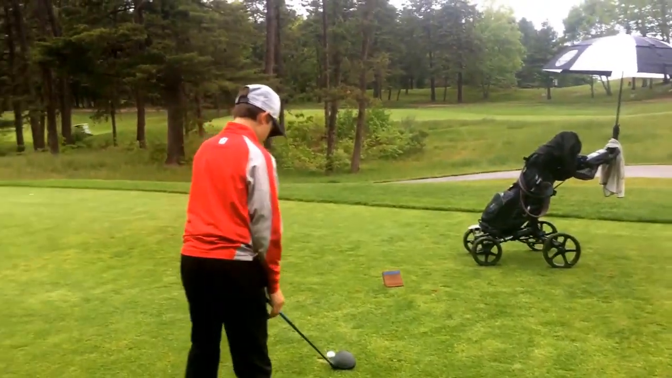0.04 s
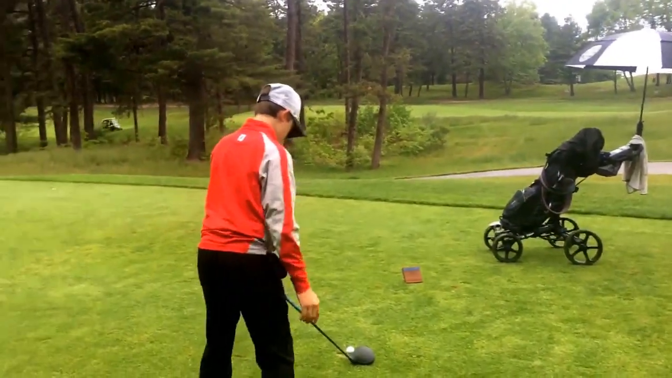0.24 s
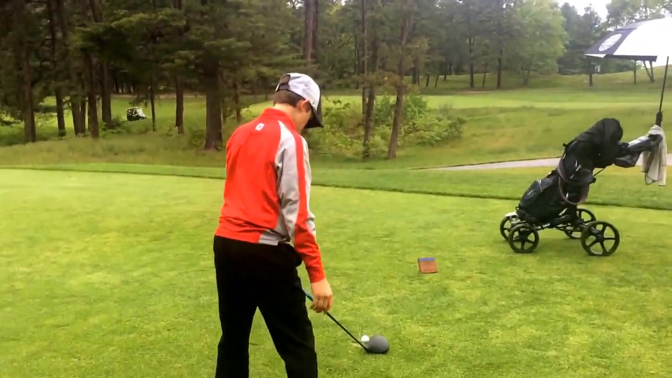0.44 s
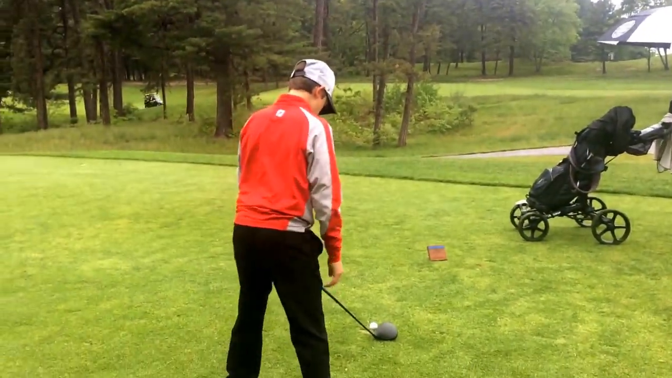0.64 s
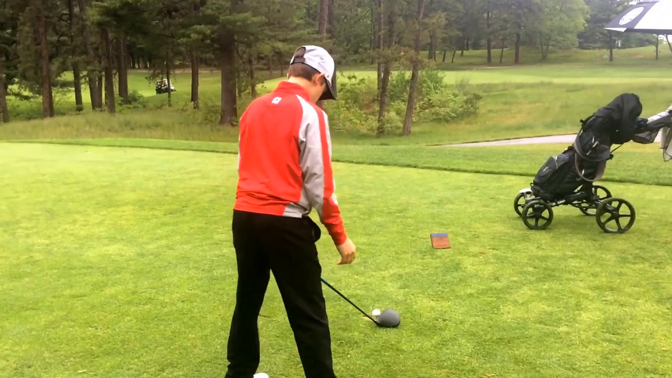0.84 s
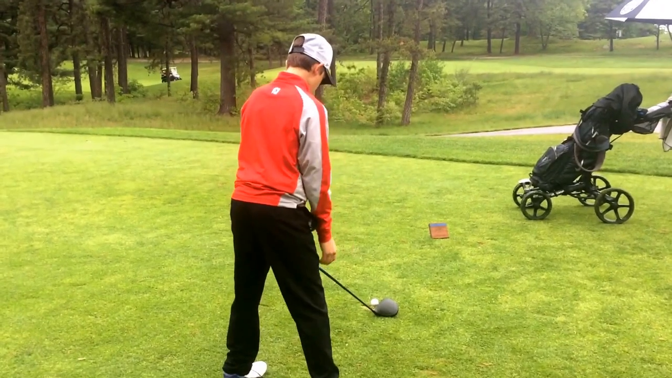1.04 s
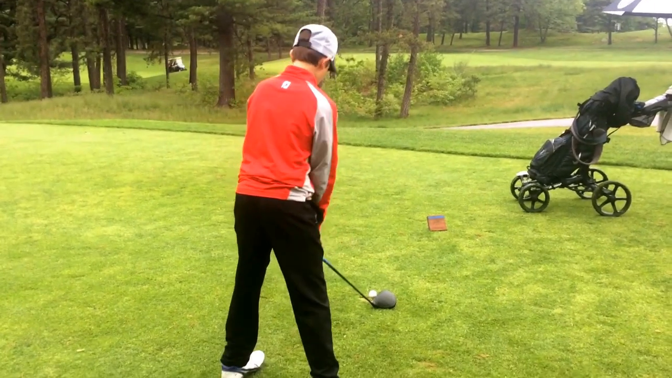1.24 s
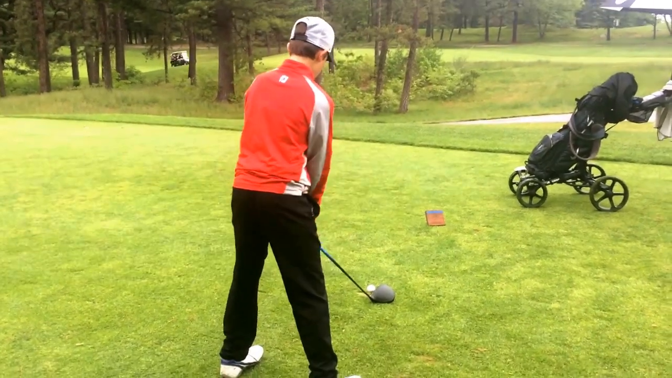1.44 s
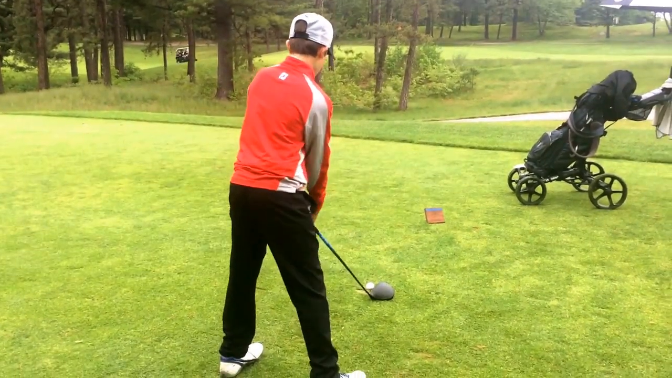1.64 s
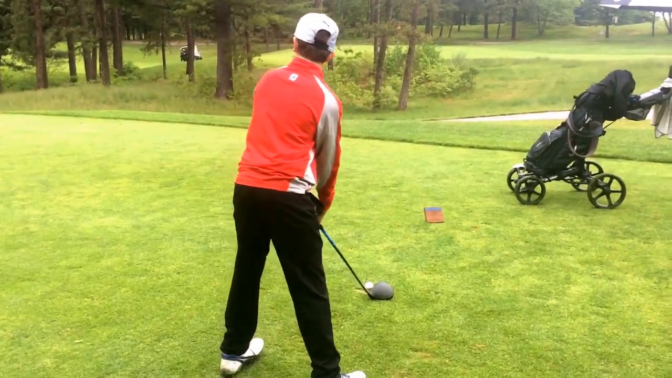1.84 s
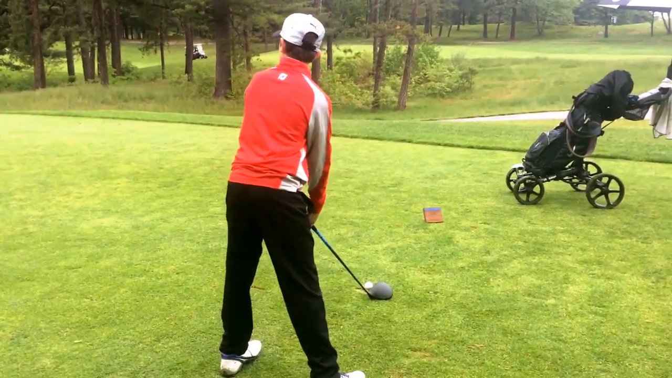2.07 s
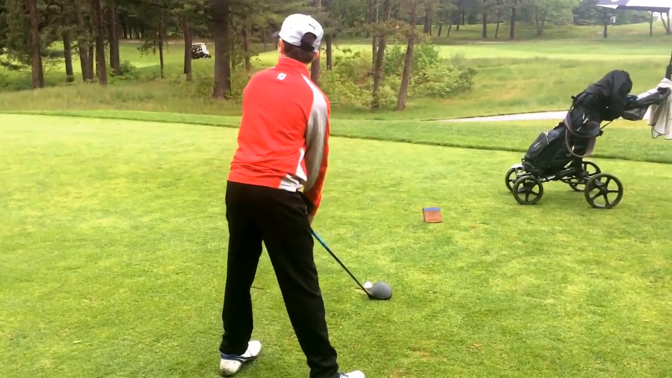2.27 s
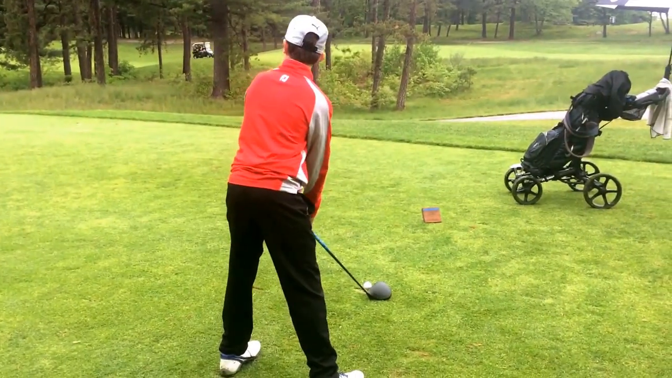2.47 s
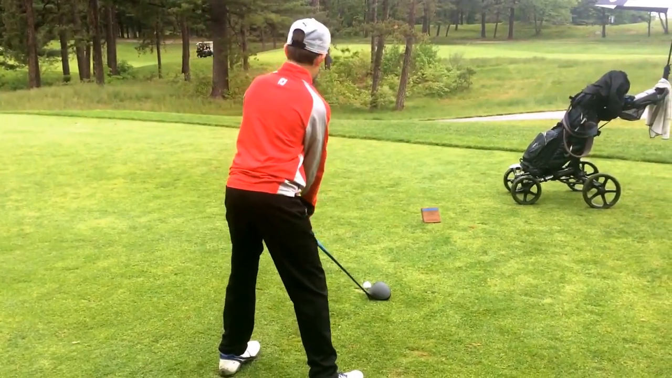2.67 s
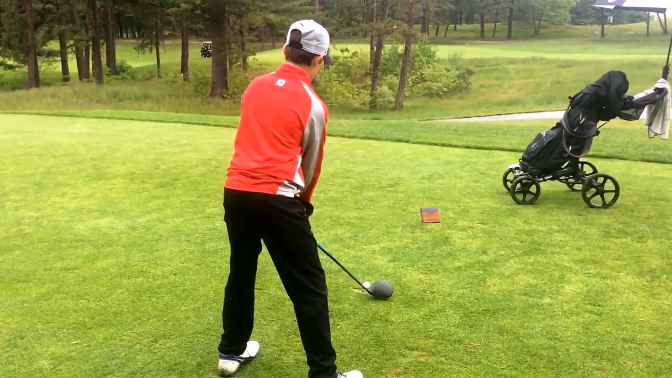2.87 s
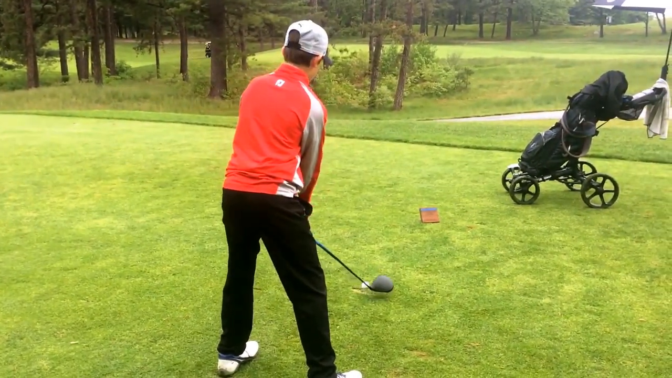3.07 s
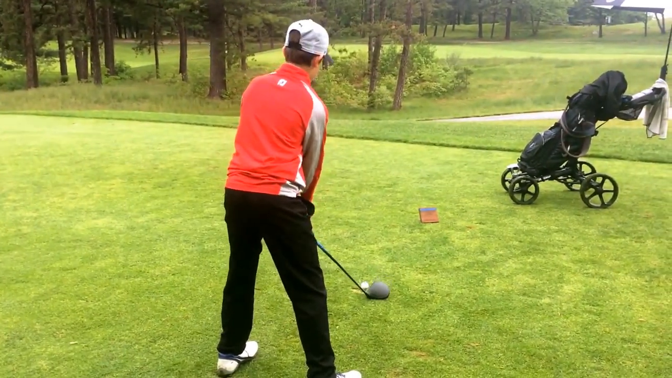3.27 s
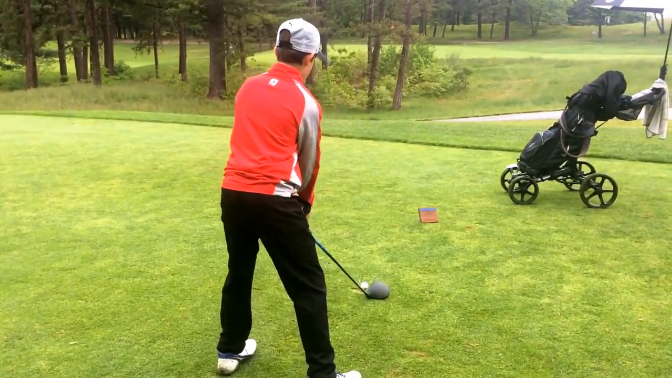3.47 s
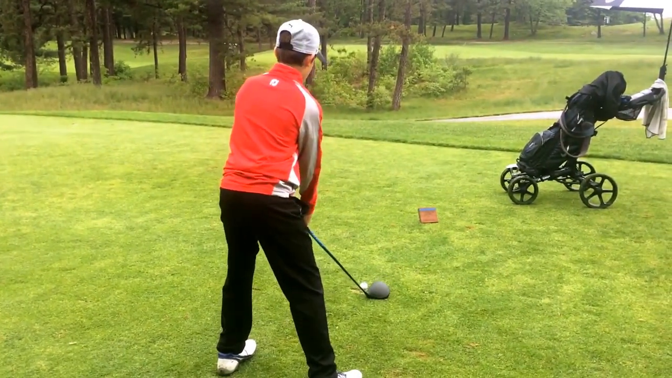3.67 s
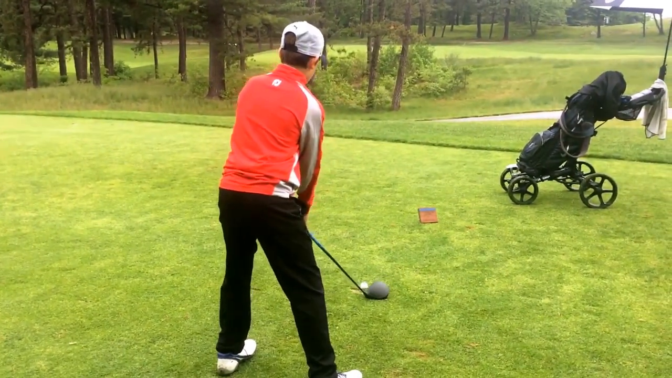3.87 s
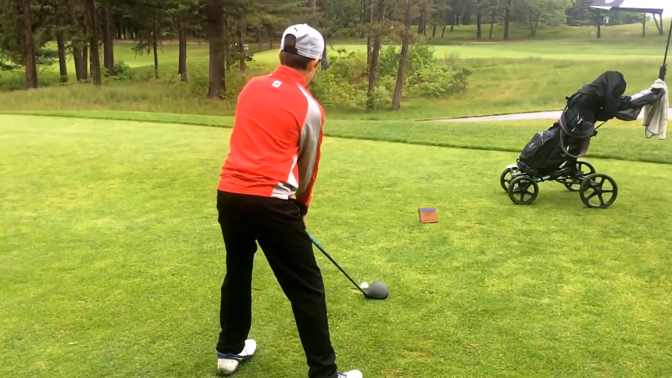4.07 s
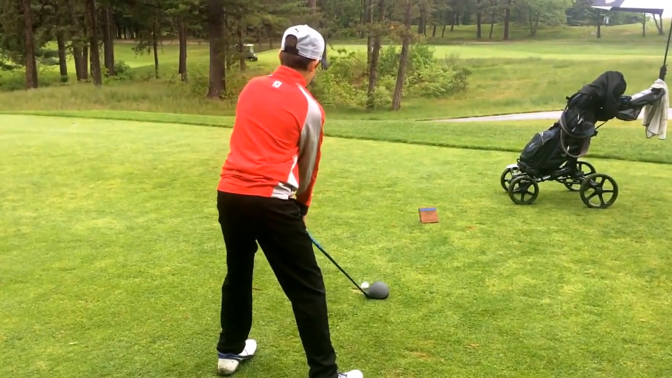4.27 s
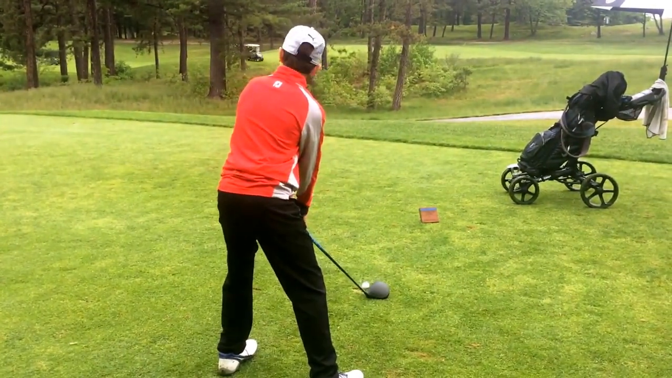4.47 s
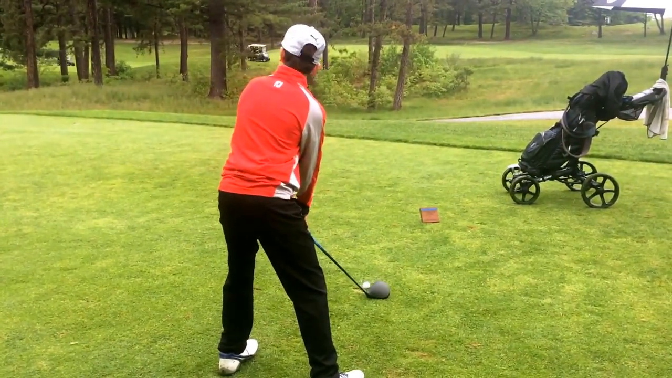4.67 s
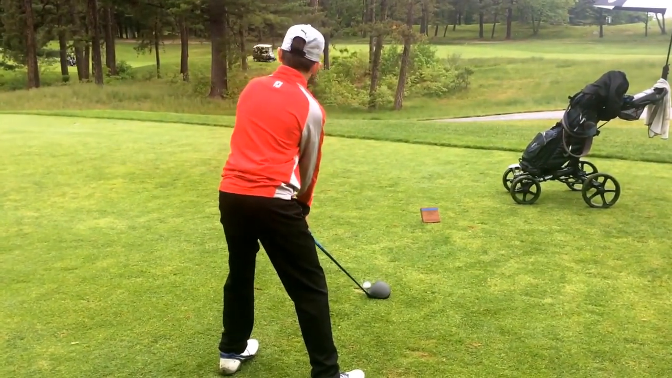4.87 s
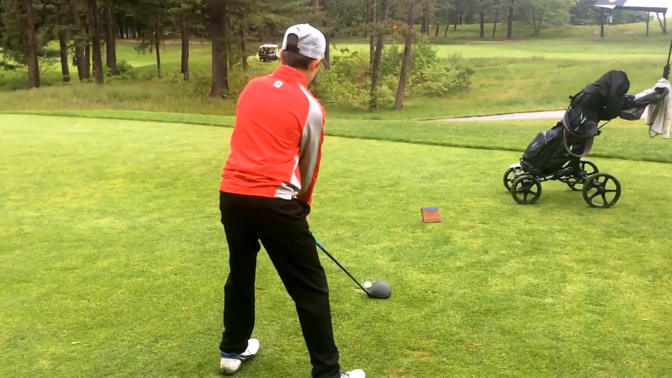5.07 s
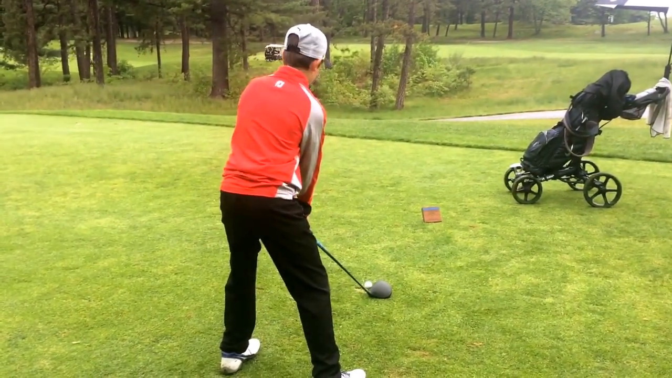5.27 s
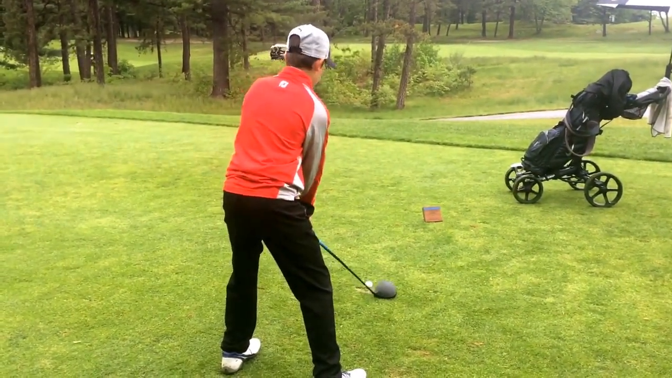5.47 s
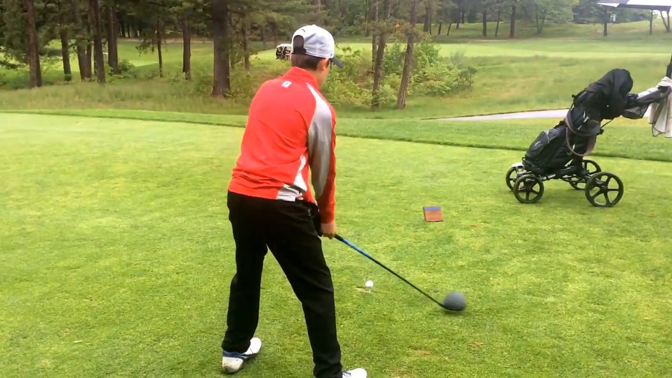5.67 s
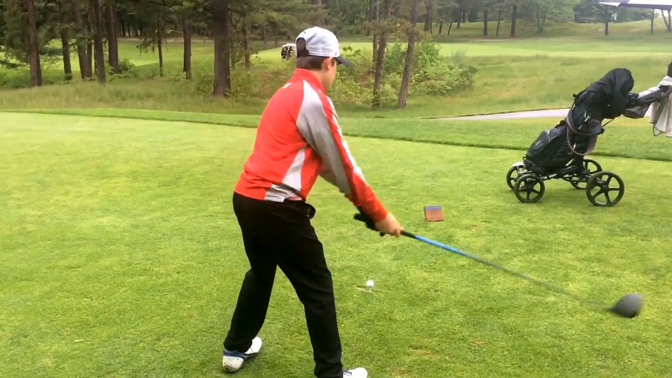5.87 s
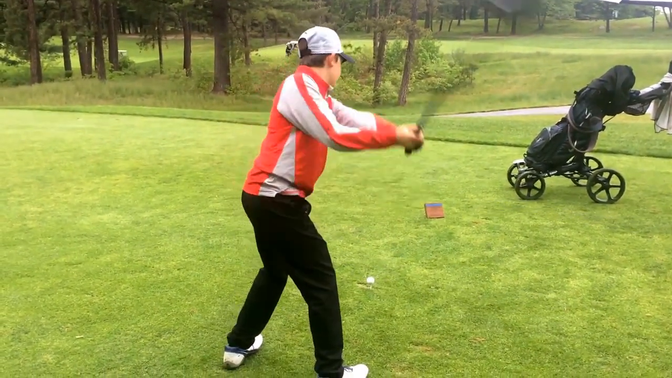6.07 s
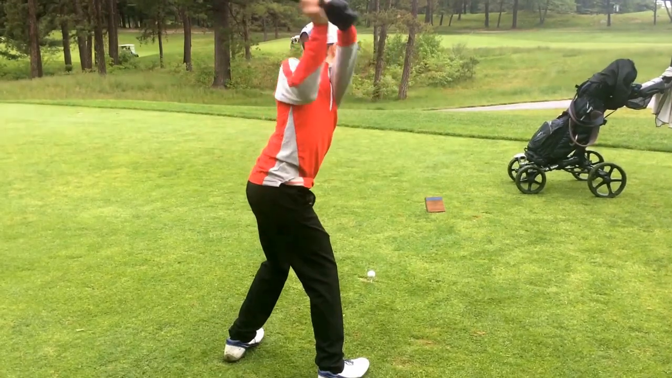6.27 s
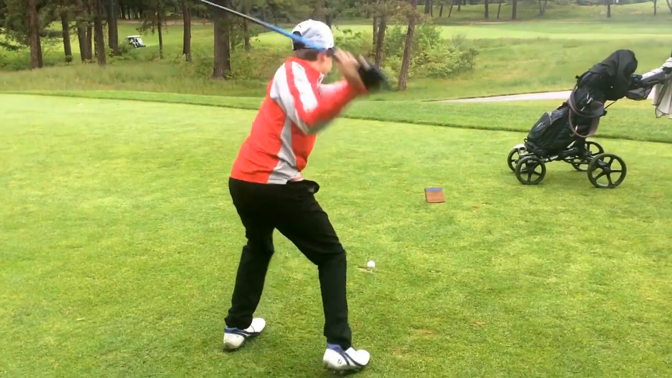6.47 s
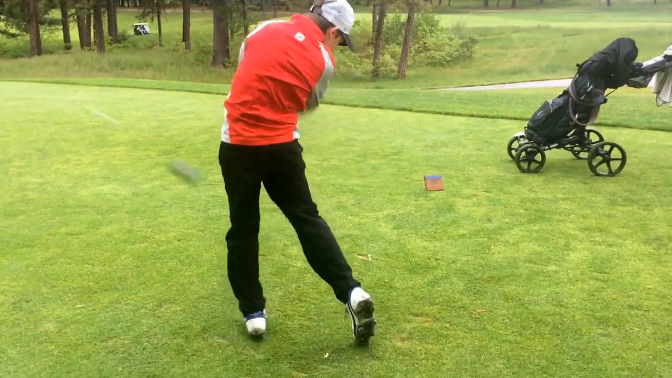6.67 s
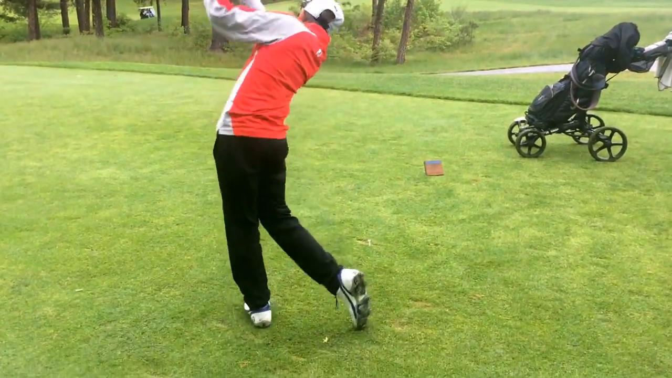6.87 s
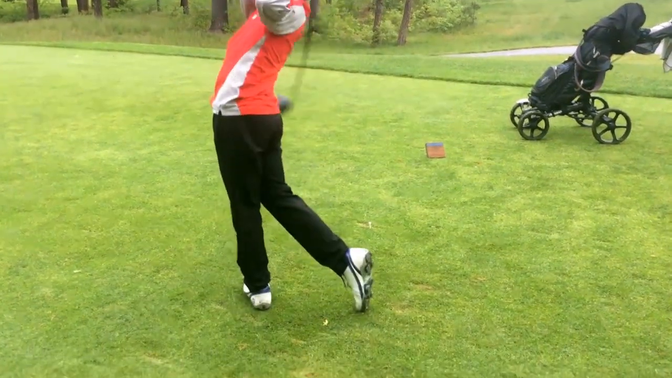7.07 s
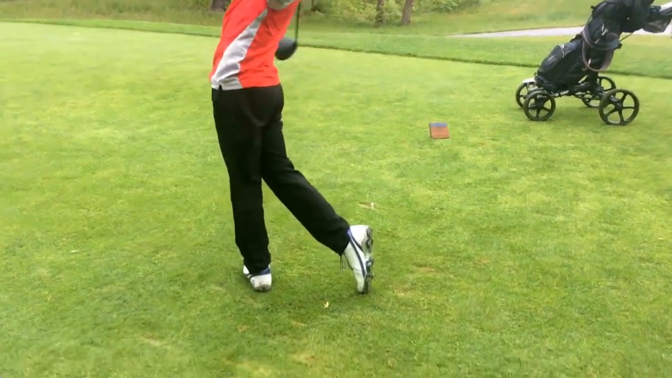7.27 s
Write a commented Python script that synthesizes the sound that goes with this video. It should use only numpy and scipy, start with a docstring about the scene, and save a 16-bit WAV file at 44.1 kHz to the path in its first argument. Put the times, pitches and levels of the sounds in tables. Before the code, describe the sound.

A golf drive comes late in a calm stretch of light rain outdoors. First there are only irregular drops tapping a nearby umbrella, two faint birds and a low, far engine. Then a soft puff of wind touches the microphone, and a club close by whooshes into the ball with one sharp metallic crack. It swishes round again more softly, and the shaft bumps the golfer's shoulders.

```python
"""A golf drive in light rain

Rain ticks on a nearby umbrella, two birds sing in echoing pines and a far engine drones.
Near the end a golf club swishes down, stirring the air, and cracks the ball off the tee.
Its hollow head rings, the club swishes round again and the shaft thumps on the shoulders."""
import sys
import numpy as np
from scipy import signal
from scipy.fft import rfft, irfft, next_fast_len
from scipy.io import wavfile
from scipy.ndimage import map_coordinates

SR = 44100
rng = np.random.default_rng(int(sys.argv[2]) if len(sys.argv) > 2 else 0)


def materialize(psi):
    """Save the field psi as 16-bit PCM at rate SR to the path in sys.argv[1].

    A 1-D psi becomes a single channel; in a 2-D psi each row is a channel.
    """
    bounded = np.clip(np.atleast_2d(psi).T, -1, 1)
    quanta = np.round(bounded * 32767).astype(np.int16)
    wavfile.write(sys.argv[1], SR, quanta)


N = 322723

# The engine's firing tone and the tone an octave above: time_s, firing_db, octave_db
ENGINE_LEVELS = [(0.0, -58, -69), (0.59, -71.5, -59.5), (1.24, -62.5, -75), (2.16, -55, -57),
                 (2.44, -53.5, -68.5), (2.65, -59, -61), (4.48, -66, -71), (4.81, -68.5, -54.5),
                 (5.87, -66, -73), (6.32, -65, -61.5), (7.32, -76, -62)]
# A colour says how strong the lows and highs of a noise are next to each other.
# Colours of the far rumble and of rain on grass and trees: frequency_hz, relative_db
RUMBLE_COLOUR = [(12, -49.5), (20, -20.5), (60, -4.5), (97, 2), (147, 1), (178, -7.5), (253, -18.5),
                 (300, -21.5), (390, -52.5), (660, -120)]
DRIZZLE_COLOUR = [(110, -42), (180, -8), (270, -11.5), (570, -16.5), (930, -18), (1600, -24), (3000, -30),
                  (6000, -34), (10000, -38.5), (15000, -40.5), (17000, -45.5)]
# Loudness of the drizzle and of the bird's trill: time_s, level_db
DRIZZLE_LEVELS = [(0, -65), (2.5, -66.5), (4.7, -67), (6.1, -66), (7.32, -63.5)]
TRILL_LEVELS = [(0, -77), (1, -74.5), (2, -74), (2.8, -77), (2.88, -110)]
# The two parts of a trill syllable: share_of_syllable, pitch_hz, relative_db
TRILL_SWEEP = [(0, 3590, -41), (.03, 3764, -9.5), (.16, 4585, 1.5), (.27, 5085, -5.5), (.4, 5084, -12),
               (.46, 4740, -49)]
TRILL_CHIP = [(.6, 6440, -42), (.66, 6325, 0), (.75, 6394, -1), (.79, 7360, 0), (.85, 6730, -1),
              (.92, 6490, -2), (.98, 6390, -41)]
# How long the pines' echo takes to fade by 60 dB: frequency_hz, fade_s
ECHO_FADES = [(300, 0.67), (2300, 1.56), (5000, 1.03), (12000, 0.44)]
# The clearest drops on the umbrella: start_s, thud_db, snap_strength_db, pitch_hz
CLEAR_DROPS = [(0.12, -50, -57.5, 1100), (0.387, -44, -67, 1340), (0.413, -48, -61.5, 1060),
               (0.474, -36, -55, 1980), (0.991, -35.5, -50, 1145), (1.034, -42, -57, 1810),
               (1.056, -44, -58, 1360), (1.194, -50, -64, 1900), (1.448, -47.5, -62, 914),
               (1.852, -55, -64, 1000), (2.108, -49, -67, 1480), (2.274, -50.5, -59.5, 910),
               (2.34, -41, -62, 1310), (2.416, -44.5, -62, 1160), (2.435, -53, -61, 1390),
               (2.632, -48.5, -68, 1680), (2.73, -48, -72, 1300), (3.167, -48.5, -61.5, 1310),
               (3.47, -42.5, -61.5, 1690), (4.107, -56, -57, 1344), (4.225, -47, -62, 1330),
               (4.563, -43.5, -61, 1610), (4.598, -49, -57.5, 980), (4.613, -46.5, -55, 1140),
               (4.949, -46, -55.5, 915), (4.985, -45.5, -57.5, 1240), (5.018, -36, -59, 1600),
               (5.231, -51, -58, 1570), (5.433, -49, -50.5, 1530), (5.559, -45, -56.5, 900),
               (5.884, -51, -72, 1620), (5.904, -35, -44, 1460), (5.919, -50, -64, 1550),
               (6.224, -42, -58, 1580), (6.236, -30.5, -51.5, 1740), (6.301, -31, -47, 1670),
               (6.453, -44, -56, 1090), (6.47, -48, -57.5, 1020), (7.168, -54, -62, 1280),
               (7.2, -52, -61, 1150)]
# Colour of a bursting drop: frequency_hz, relative_db
SNAP_COLOUR = [(300, -28), (1500, 8), (3000, 0.5), (7000, -4), (11000, -14), (16000, -25)]
# Brief rings: drips on the umbrella, and last a high ring as the club finishes: start_s, level_db, pitch_hz
BRIEF_RINGS = [(1.594, -46, 3430), (4.345, -56, 2200), (4.366, -42, 5330), (4.368, -54, 2850),
               (6.206, -52.5, 2790), (6.495, -47, 2140), (6.545, -51, 6270), (6.984, -35, 5090)]
# A faint falling note before the bird's whistles: time_s, pitch_hz, level_db
OPENING_NOTE = [(.2, 2850, -81), (.24, 2660, -71), (.3, 2590, -72), (.35, 2480, -86)]
# Whistled notes, in pairs: start_s, length_s, peak_after_s, pitch_hz, level_db, droop_hz
BIRD_NOTES = [(.41, 0.24, .1, 2330, -55.5, 27), (.8, .22, .14, 2310, -58, 79),
              (3.538, 0.233, 0.1295, 2300, -52.5, 15), (3.9, 0.23, 0.094, 2322, -55, 73)]
# Moves of the golfer's jacket: start_s, hold_s, level_db
JACKET_MOVES = [(3.31, .1, -73), (4.244, .1, -71), (6.172, 0.017, -76), (6.304, 0.4, -68.5)]
# Colours of the jacket and of a wind puff: frequency_hz, relative_db
JACKET_COLOUR = [(500, -33), (1200, 0), (3000, 0), (5000, -8), (12000, -17)]
WIND_COLOUR = [(20, -17), (55, -2), (110, 2), (170, -21), (300, -75)]
# Passes of the club: fastest_s, rise_s, fall_s, top_pitch_hz, whistle_db, hiss_lag_s, hiss_db
CLUB_PASSES = [(6.684, .11, .06, 771, -33.5, .022, -41.5), (7.025, 0.1, 0.16, 332.6, -47.5, 0.029, -45)]
# Hiss of the falling club, then of club and jacket at the finish: frequency_hz, relative_db
DOWNSWING_COLOUR = [(530, -23), (900, -5.5), (1130, -12.5), (1450, -13.5), (2390, -18.5), (13500, -31),
                    (15600, -38)]
FINISH_COLOUR = [(240, -31), (400, -5.5), (650, -14), (1100, -3.5), (2200, -12), (3300, -16), (4900, -8),
                 (6200, -15), (8700, -17), (11300, -26.5), (13200, -24), (15600, -32)]
# The club face's crack and the duller hiss that dies last: frequency_hz, relative_db
CRACK_COLOUR = [(700, -41), (1200, -15.5), (2500, -7.5), (3300, -18.5), (4200, -7.5), (5500, -6),
                (9000, -7.5), (13000, -14.5), (15600, -19)]
CRACK_TAIL_COLOUR = [(1500, -25), (2300, 1), (4500, -3.5), (7500, -8), (11000, -25)]
# Tones of the hollow head, swelling as it turns to the listener: pitch_hz, level_db, fade_s, swell_s
HEAD_TONES = [(1766, -35.5, 0.4, 0.03), (1910, -35, .3, 0.0248), (2066, -26, 0.29, .015),
              (2443, -24, 0.24, 0.0044), (2600, -27, 0.13, 0.006), (3083, -20.5, 0.12, 0.0085),
              (3460, -23.5, .06, 0.0078), (4140, -14, 0.059, 0.0013), (4350, -20, 0.076, 0.0033),
              (4500, -23, 0.093, 0.0079), (5460, -24, 0.089, 0.012), (6260, -24, 0.16, 0.0098),
              (6340, -24, 0.078, .016), (6595, -11, .07, 0.014), (6850, -12.5, 0.072, 0.015),
              (7370, -24.5, 0.052, 0.0021), (8150, -26.5, 0.087, 0.0088), (9070, -26, 0.053, .002),
              (9500, -28.5, .06, 0.014), (10130, -19.5, 0.069, .012), (12500, -26, 0.025, 0.00091)]


def amp(db):
    """Turns decibels into a number to multiply by."""
    return 10 ** (np.asarray(db) / 20)


def unit(x):
    """Scales a sound to an average power of 1."""
    return x / np.sqrt(np.mean(x ** 2) + 1e-20)


def along(points, hz):
    """Reads between the rows of a frequency table, giving octaves about equal room."""
    frequencies, values = np.transpose(points)
    return np.interp(np.log(hz + 1), np.log(frequencies + 1), values)


def curves(rows):
    """Turns each column after the time into one value per sample."""
    times, *columns = np.transpose(rows)
    return [np.interp(np.arange(N) / SR, times, column) for column in columns]


def wobble(rate):
    """A smooth curve through `rate` random values a second."""
    return map_coordinates(rng.standard_normal(int(N * rate / SR) + 4), [np.arange(N) * rate / SR])


def swell(start_s, hold_s, db, rise_s, fall_s):
    """Loudness that climbs 40 dB per rise_s, holds from start_s, then sinks 40 dB per fall_s."""
    t = np.arange(N) / SR - start_s
    return amp(db - 40 * np.maximum(0, np.maximum(-t / rise_s, (t - hold_s) / fall_s)))


def filtered(x, response):
    """Turns each frequency up or down by response(hz)."""
    size = next_fast_len(len(x) + 8192)
    return irfft(rfft(x, size) * response(np.fft.rfftfreq(size, 1 / SR)), size)[:len(x)]


def noise(colour, size=N):
    """Noise of the given colour, with power 1."""
    return unit(filtered(rng.standard_normal(size), lambda hz: amp(along(colour, hz))))


def tone(hz):
    """A pure tone of power 1 that follows a pitch curve."""
    return np.sqrt(2) * np.sin(2 * np.pi * np.cumsum(hz) / SR)


def breathy_tone(hz, width_hz):
    """A narrow band of noise that follows a pitch curve."""
    phase = 2 * np.pi * np.cumsum(hz) / SR
    return unit(wobble(width_hz) * np.cos(phase) + wobble(width_hz) * np.sin(phase))


def ring(db, hz, fade_s):
    """A short rough ring that starts softly and loses 60 dB in fade_s."""
    t = np.arange(SR // 8) / SR
    drift = .021 * np.sqrt(hz / 50) * rng.standard_normal(len(t)).cumsum()
    return np.sin(2 * np.pi * hz * t + drift) * amp(db - 60 * t / fade_s) * (1 - np.exp(-t / .0032))


def add(track, start_s, sound):
    """Mixes a short sound into a track."""
    part = track[round(start_s * SR):][:len(sound)]
    part += sound[:len(part)]


def far_engine():
    """An engine fires in a wavering drone; a rumble gently follows its louder tone."""
    firing_db, octave_db = curves(ENGINE_LEVELS)
    firing_hz = 78.8 + .5 * wobble(1.5)
    firing = amp(firing_db + 1.8 * wobble(6.9)) * tone(firing_hz)
    octave = amp(octave_db + 2.2 * wobble(8.8)) * tone(2 * firing_hz)
    louder_db = np.maximum(firing_db, octave_db)
    rumble_db = -57 + .28 * (louder_db - louder_db.mean()) + 1.5 * wobble(6)
    return firing + octave + amp(rumble_db) * noise(RUMBLE_COLOUR)


def drizzle():
    """Fine rain on grass and trees blends into an even hiss."""
    return amp(curves(DRIZZLE_LEVELS)[0] + .7 * wobble(9)) * noise(DRIZZLE_COLOUR)


def trilling_bird():
    """A bird repeats one syllable: a rising sweep, then a high chip."""
    t = np.arange(N) / SR
    share = (14.16 * t - .15 * t ** 2 - .115) % 1  # about 14 syllables a second, slowing a little
    out, trill_db = 0, curves(TRILL_LEVELS)[0]
    for shape, part_db, echo_db in (TRILL_SWEEP, 0, -1.5), (TRILL_CHIP, -2, 2.5):
        at, hz, db = np.transpose(shape)
        level_db = trill_db + part_db + np.interp(share, at, db)
        flutter_db = 1.2 * wobble(14) + 1.5 * wobble(150)
        note = amp(level_db + flutter_db) * tone(np.interp(share, at, hz))
        out += note + amp(echo_db) * pine_echo(note)
    return out


def pine_echo(sound):
    """The trees scatter sound back; each frequency dies at its own speed."""
    hz, t, spectrum = signal.stft(rng.standard_normal(SR), SR, nperseg=256)
    fade = amp(-60 * t / along(ECHO_FADES, hz)[:, None])
    tail = signal.istft(spectrum * fade, SR, nperseg=256)[1]
    return signal.fftconvolve(sound, tail / np.linalg.norm(tail))[:N]


def drop(thud_db, snap_strength_db, hz):
    """The fabric dents, swings back harder and settles; the drop bursts in a bright snap."""
    t = np.arange(700) / SR
    cycles = t * hz
    thud = np.sin(2 * np.pi * cycles) * cycles ** 2 * amp(thud_db + 27.5 - 31.3 * cycles)
    snap = noise(SNAP_COLOUR, len(t)) * (amp(-60 * t / .0032) + amp(-20 - 60 * t / .035))
    return thud + amp(snap_strength_db - 7) * np.roll(unit(snap), 12)


def umbrella_rain():
    """Clear drops and brief rings land at set times, many faint drops at random."""
    out = np.zeros(N)
    for start_s, *settings in CLEAR_DROPS:
        add(out, start_s + .000896, drop(*settings))
    for when, faintness, brightness, pitch in rng.random((235, 4)):
        thud_db = min(-70 - 4 * np.log(faintness + 1e-4), -56)
        add(out, when * N / SR, drop(thud_db, thud_db - 21 + 8 * brightness, hz=700 * 4 ** pitch))
    for start_s, db, hz in BRIEF_RINGS:
        add(out, start_s, ring(db, hz, fade_s=.04))
    return out


def whistling_bird(slide_hz=223, slide_s=.0115, arch_hz=45.4, arch_db=9.5, arch_s=.04, edge_s=.014):
    """A far bird's fluttering notes: each slides down, arches up in pitch and loudness, then droops."""
    t = np.arange(N) / SR
    flutter, waver = wobble(30), wobble(40)
    hz, db = curves(OPENING_NOTE)
    out = amp(db + 2.5 * flutter) * breathy_tone(hz, width_hz=130) * (db > OPENING_NOTE[0][2])
    for start_s, length_s, peak_after_s, pitch_hz, level_db, droop_hz in BIRD_NOTES:
        age_s = np.clip(t - start_s, 0, length_s)
        arch = np.exp(-((age_s - peak_after_s) / arch_s) ** 2)
        hz = pitch_hz + slide_hz * np.exp(-age_s / slide_s) + arch_hz * arch
        hz -= droop_hz * (age_s / length_s) ** 3
        edges = np.clip(np.minimum(age_s, length_s - age_s) / edge_s, 0, 1)
        out += edges * amp(level_db + arch_db * (arch - 1) + 3.8 * flutter) * tone(hz + 8 * waver)
    return out + amp(-7) * pine_echo(out)


def far_hum():
    """A faint, far hum comes and goes."""
    loudness = swell(start_s=1.85, hold_s=.38, db=-74, rise_s=.2, fall_s=.3)
    return loudness * breathy_tone(hz=np.full(N, 405), width_hz=90)


def jacket_rustle():
    """The jacket rustles each time the golfer moves."""
    moves = sum(swell(*move, rise_s=.021, fall_s=.32) for move in JACKET_MOVES)
    return moves * amp(2.7 * wobble(140)) * noise(JACKET_COLOUR)


def wind_puff():
    """Wind hits the microphone in one low puff."""
    return swell(start_s=5.94, hold_s=.111, db=-47, rise_s=.054, fall_s=.04) * noise(WIND_COLOUR)


def club_speed(fastest_s, rise_s, fall_s):
    """The club speeds up from 0 to 1, then slows again."""
    t = np.arange(N) / SR - fastest_s
    return np.exp(-(t / np.where(t < 0, rise_s, fall_s)) ** 2)


def club_swishes(whistle_power=4.7, hiss_power=3.93):
    """Air swirls off shaft and head: more speed makes a higher, louder whistle and more hiss."""
    hz, loudness, hiss = 0, 0, 0
    for club_pass, colour in zip(CLUB_PASSES, (DOWNSWING_COLOUR, FINISH_COLOUR)):
        fastest_s, rise_s, fall_s, top_pitch_hz, whistle_db, lag_s, hiss_db = club_pass
        speed = club_speed(fastest_s, rise_s, fall_s)
        hz += top_pitch_hz * speed
        loudness += amp(whistle_db) * speed ** whistle_power
        late_speed = club_speed(fastest_s + lag_s, rise_s + lag_s, fall_s - lag_s)
        hiss += late_speed ** hiss_power * amp(hiss_db + 1.5 * wobble(400)) * noise(colour)
    whistle = breathy_tone(hz, width_hz=300)
    whistle += amp(-6) * breathy_tone(.6 * hz, width_hz=300)
    whistle += amp(-17.5) * breathy_tone(2.1 * hz, width_hz=900)
    return hiss + loudness * whistle


def ball_strike(start_s=6.7074, glide_hz=140, glide_s=.06):
    """The club brushes the tee, the ball squashes in one low pulse, the face cracks, the head rings."""
    blow, head, t = np.zeros(N), np.zeros(N), np.arange(SR // 2) / SR
    tee = amp(-29.5 - 60 * t / .0044) * np.sin(2 * np.pi * 2800 * t)
    squash = amp(4 - 60 * t / .0039) * np.sin(2 * np.pi * 990 * t) * (1 - np.exp(-(t / .00065) ** 2))
    crack = noise(CRACK_COLOUR, len(t)) * (amp(-14 - 60 * t / .015) + amp(-23 - 60 * t / .093))
    crack += noise(CRACK_TAIL_COLOUR, len(t)) * amp(-41.5 - 60 * t / .49)
    add(blow, start_s - .0014, tee)
    add(blow, start_s + .0002, crack)
    # As the head flies on, each of its tones glides up and blurs.
    glide = np.cumsum(glide_hz * (1 - np.exp(-(t / glide_s) ** 2))) / SR
    for hz, db, fade_s, swell_s in HEAD_TONES:
        blur = .046 * np.sqrt(hz / 4000) * rng.standard_normal(len(t)).cumsum()
        loudness = amp(db - 60 * t / fade_s) * (1 - np.exp(-(t / swell_s) ** 3))
        add(head, start_s, loudness * np.sin(2 * np.pi * (hz * t + glide) + blur))
    echo = pine_echo(amp(-18) * blow + amp(-32) * head)
    add(blow, start_s, squash)  # this pulse gets no echo
    return blow + head + echo


def shoulder_thump():
    """The shaft lands across the golfer's shoulders."""
    out = np.zeros(N)
    add(out, start_s=7.018, sound=ring(db=-30, hz=373, fade_s=.035))
    return out


def scene():
    """Adds all the sounds into one channel."""
    outdoors = far_engine() + drizzle() + trilling_bird() + umbrella_rain() + whistling_bird()
    outdoors += far_hum() + wind_puff()
    golfer = jacket_rustle() + club_swishes() + ball_strike() + shoulder_thump()
    return (outdoors + golfer)[None]


def record(dry, top_hz=15450):
    """The microphone cuts off the very highest sounds."""
    return filtered(dry[0], lambda hz: 1 / (1 + (hz / top_hz) ** 80))[None]


dry = scene()
out = record(dry)
materialize(out)
```